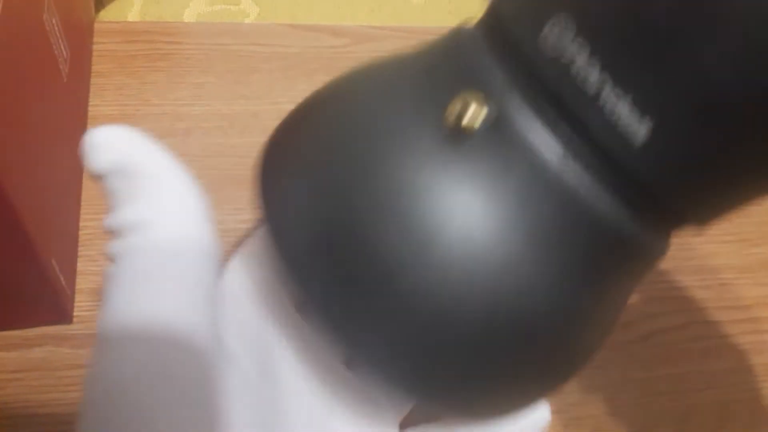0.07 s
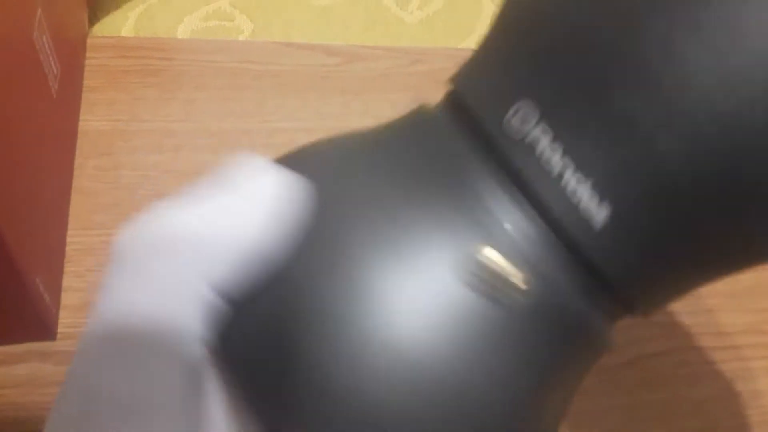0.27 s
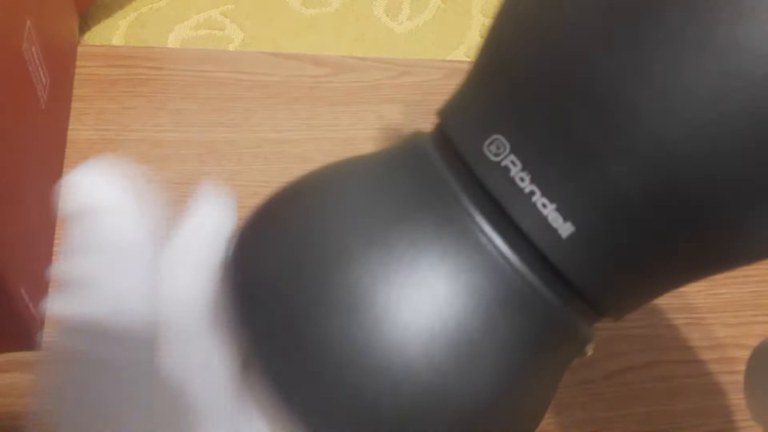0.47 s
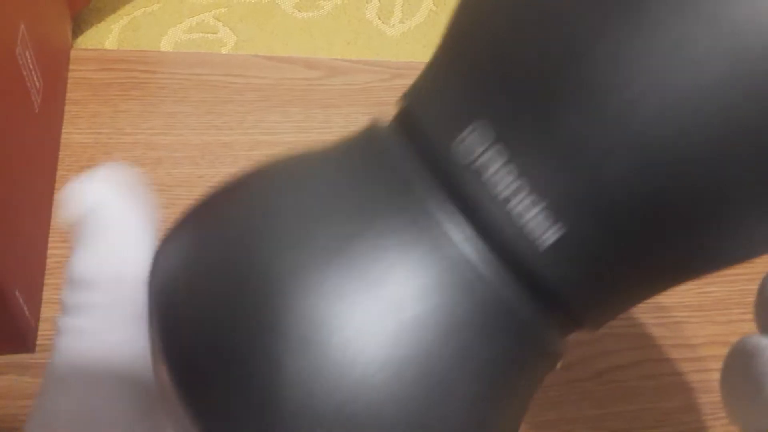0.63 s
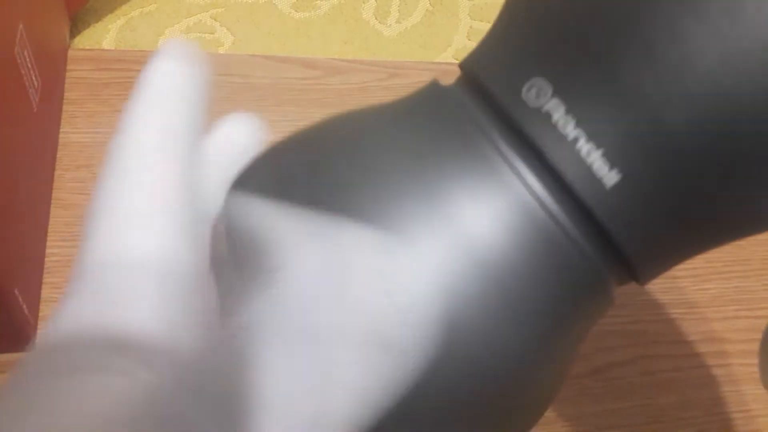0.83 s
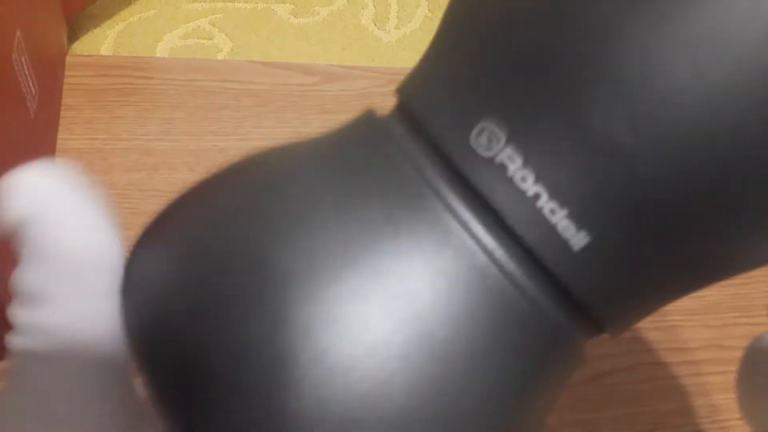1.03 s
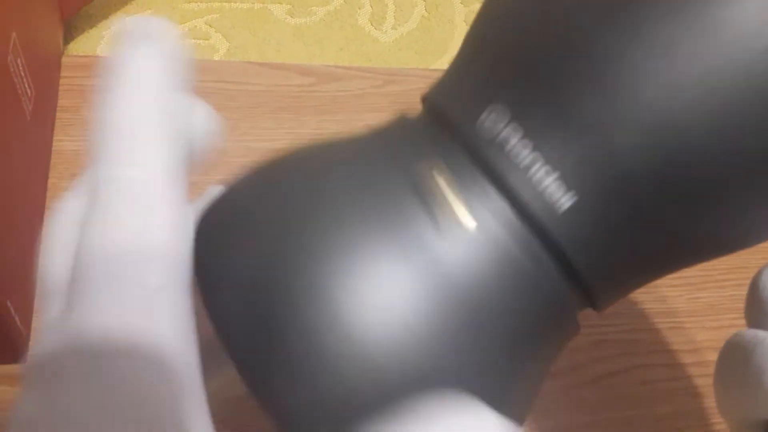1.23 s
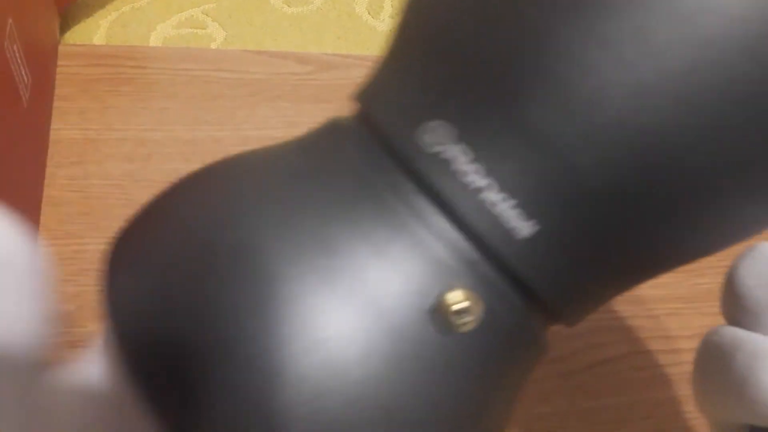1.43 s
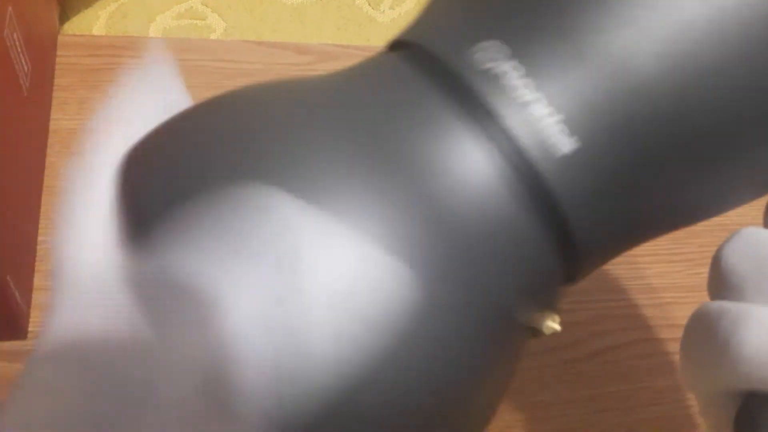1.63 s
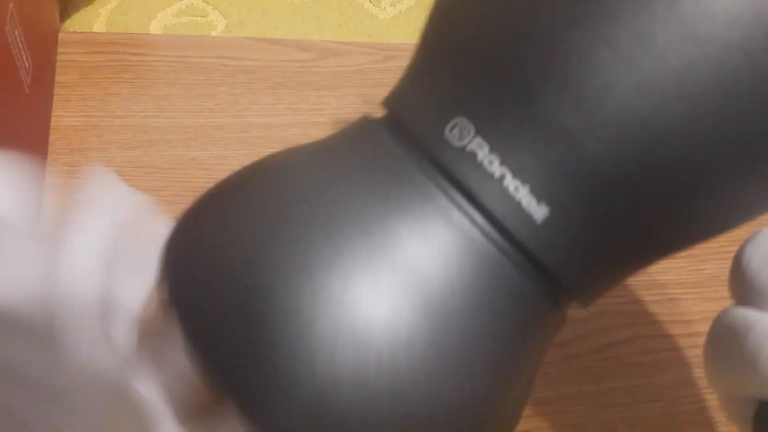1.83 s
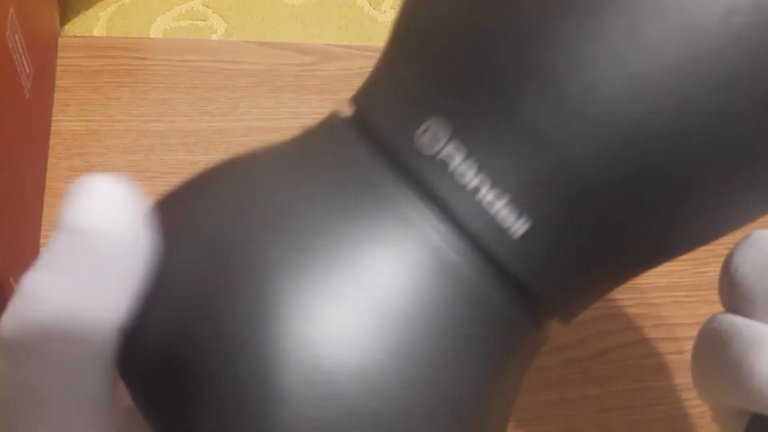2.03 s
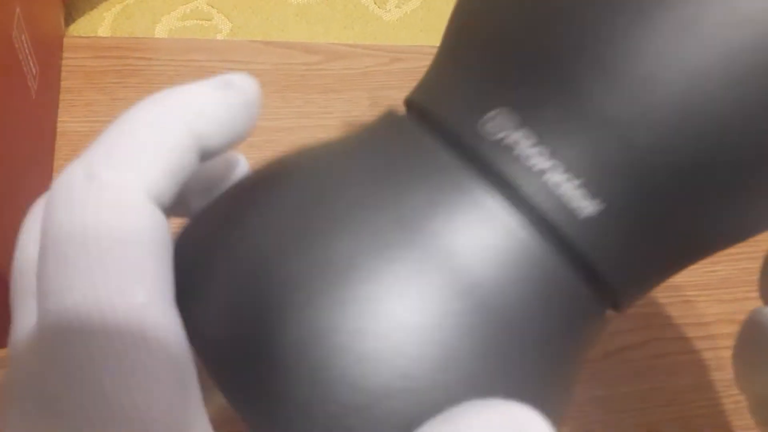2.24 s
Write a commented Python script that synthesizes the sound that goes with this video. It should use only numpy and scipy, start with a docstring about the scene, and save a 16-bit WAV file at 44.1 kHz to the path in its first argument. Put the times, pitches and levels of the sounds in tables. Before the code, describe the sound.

A metal coffee pot's loose base clanks as gloved hands spin it on its thread. Sharp, briefly ringing clanks land at about 0.2, 0.6, 1.1 and 1.6 seconds, with a softer one at 2.1. After each, the base scrapes round and wobbles with quick, duller clacks and small ticks. Faint glove brushing, soft bumps and low handling rumble lie underneath, in a small quiet room.

```python
"""Spinning a coffee pot base

Gloved hands spin the loose base of a metal coffee pot on its screw thread, in a small room.
Each push knocks the base against the thread and rings the shell; the base scrapes round,
ticks on the thread edges and clacks as it wobbles. Cotton gloves brush, rub and softly bump
the metal, and the pot rumbles as it shifts in the hands."""
import sys
import numpy as np
from scipy import signal
from scipy.fft import rfft, irfft
from scipy.io import wavfile
from scipy.ndimage import uniform_filter1d

SR = 44100
rng = np.random.default_rng(int(sys.argv[2]) if len(sys.argv) > 2 else 0)


def unload_wav(signal):
    """Save mono or channel-first audio to the path in sys.argv[1] as 16-bit WAV at rate SR, clipped to [-1, 1]."""
    wavfile.write(
        sys.argv[1],
        SR,
        np.round(np.clip(np.atleast_2d(signal).T, -1, 1) * 32767).astype(np.int16),
    )


N = 105840

# room tone spectrum (frequency [Hz], gain [dB])
ROOM_TONE_EQ = [(25, -25), (60, -11.5), (120, -8.5), (220, 2), (450, -3), (1100, -8), (2000, 0),
                (3100, -10.5), (4000, -20), (5000, -21.5), (9500, -27.5), (13000, -22)]
# room decay (frequency [Hz], t60 [s])
ROOM_DECAY = [(150, 0.21), (600, 0.26), (2000, 0.31), (5000, 0.44), (12000, 0.33)]
# handling rumble envelope (time [s], level [dB])
RUMBLE_ENVELOPE = [(0, -69), (.12, -64), (.42, -68), (.62, -65), (0.949, -62), (1.2, -55.5), (1.42, -74),
                   (1.75, -52), (1.9, -78), (2.15, -53.5), (2.4, -66.5)]
# rumble spectrum (frequency [Hz], gain [dB])
RUMBLE_EQ = [(30, -15), (65, -17), (110, -2.5), (170, -6.5), (300, -11), (700, -38.5), (3000, -68)]
# rub of the steadying hand (time [s], level [dB])
RUB_ENVELOPE = [(0, -48.5), (.07, -60), (.14, -82), (2.22, -81), (2.30, -59.5), (2.39, -56)]
# rub spectrum (frequency [Hz], gain [dB])
RUB_EQ = [(300, -25), (1200, -3), (2050, -4), (2600, -5), (3200, -6.5), (4500, -18), (6000, -25),
          (13000, -31.5)]
# glove strokes (centre [s], sigma [s], level [dB])
GLOVE_STROKES = [(0.122, 0.081, -70), (0.363, 0.0652, -56), (.8, 0.051, -61.5), (1.238, 0.033, -53),
                 (1.717, 0.056, -61), (2.213, 0.0352, -53)]
# cotton hiss spectrum (frequency [Hz], gain [dB])
COTTON_EQ = [(500, -2.5), (3000, 4), (5000, -5), (7500, 0), (9500, -10), (12500, 5.5), (14000, -29)]
# hand bumps (time [s], frequency [Hz], level [dB])
HAND_BUMPS = [(0.02, 200, -45), (.15, 160, -43), (.18, 200, -39), (.565, 160, -39.5), (1.073, 201, -28),
              (1.512, 240, -42.5), (1.963, 272, -57), (1.987, 220, -34.5), (2.079, 165, -34.5),
              (2.138, 206, -48), (2.213, 223, -33.5), (2.265, 200, -42)]
# thread edge ticks (time [s], level [dB])
THREAD_TICKS = [(.3465, -48.5), (0.422, -44), (0.822, -71), (1.268, -39.5), (1.758, -47)]
# tick spectrum (frequency [Hz], gain [dB])
TICK_EQ = [(1000, -37), (4500, 8), (5400, -4.5), (6200, -3), (7500, 8.5), (8600, -14.5), (13000, -11.5)]
# turns of the base (start [s], end [s], level [dB])
BASE_TURNS = [(0.271, 0.428, -35.5), (0.644, 0.856, -36.5), (1.068, 1.304, -37), (1.589, 1.69, -41),
              (1.659, 1.765, -33), (2.069, 2.139, -35)]
# thread scrape spectrum (frequency [Hz], gain [dB])
SCRAPE_EQ = [(60, -51.5), (180, -5.5), (400, -9), (850, -0.5), (1250, -6), (1700, 3.5), (2400, 1.5),
             (3400, -18.5), (4100, -6.5), (5200, -39.5), (9000, -33.5), (13000, -38.5)]
# metal contact spectrum (frequency [Hz], gain [dB])
CONTACT_EQ = [(40, -36.5), (180, -12.5), (400, -18.5), (900, -9.5), (1150, -8), (1400, -3.5), (1700, 5.5),
              (2450, 2.5), (2800, -8.5), (3500, -12.5), (4200, -10), (5200, -20.5), (7000, -33),
              (9500, -34.5), (13000, -29.5)]
# threaded rim (frequency [Hz], gain [dB], t60 [s])
RIM_MODES = [(1600, -25, 0.33), (1650, -9, 0.23), (2065, -10.5, 0.39), (2987, -2.5, 0.1),
             (4010, -5, 0.0667), (4113, -9.5, 0.083), (5416, -22, 0.24), (6700, -36.5, 0.5),
             (7040, -35, 0.292), (7400, -34.5, 0.22), (7560, -33, .2), (8340, -35.5, 0.27)]
# hand-damped body (frequency [Hz], gain [dB], t60 [s])
BODY_MODES = [(520, -29, 0.045), (1432, -7.5, 0.023), (1652, -1.5, 0.034), (1737, -1.5, 0.033),
              (2050, -4, 0.019), (2400, -4, 0.035), (2496, -3, 0.02)]
# thin shell (frequency [Hz], gain [dB], t60 [s])
SHELL_MODES = [(2885, -16, 0.45), (3000, -8, 0.18), (3099, -3, 0.097), (4040, -11.5, 0.12),
               (4130, -13.5, 0.25), (4212, -13.5, 0.178), (4220, -27, .17), (4610, -24, 0.21),
               (6384, -26, 0.32), (6370, -36, 0.29), (6580, -27, 0.32), (7210, -34, 0.26), (7780, -37, .2),
               (8380, -34.5, 0.455), (10314, -52, 0.32), (11390, -42, .25)]
# whole pot in the hands (frequency [Hz], gain [dB], t60 [s])
THUD_MODES = [(200, -44, 0.068), (313, -44.5, 0.061)]
# wobble impacts (time [s], gain [dB], pitch [Hz], chatter width [s], treble edge [Hz], rim gain [dB])
WOBBLES = [(0.0214, -18.5, 2050, 0.0029, 3007, -25.5), (0.15, -37, 833, 0.0027, 1850, -22.5),
           (.1828, -15, 1490, 0.003, 1760, -14), (0.226, -16, 1990, .002, 3500, -21),
           (0.2474, -20, 1862, 0.0015, 3480, 8), (0.341, -8, 1780, .002, 2710, 4),
           (0.3454, -2.5, 1922, 0.0024, 3600, -11), (0.3875, -11, 1960, 0.0019, 2700, -12),
           (.4160, -4.5, 1820, 0.0037, 2590, -9), (0.4212, -7, 1782, .0015, 2600, -19),
           (0.6347, -24.5, 1860, 0.0021, 2400, -17), (.6560, -40, 3000, .002, 4320, -15),
           (0.6773, -8, 1720, 0.0013, 2730, 0), (0.6994, -14, 1800, 0.003, 3250, -42),
           (0.7312, -16.5, 1640, 0.00133, 2600, -24), (0.821, -7, 1734, 0.0022, 2590, -20),
           (1.0551, -13, 1760, 0.0025, 3200, 6), (1.0589, -11.5, 1574, 0.0022, 3240, -15),
           (1.1036, -7, 1610, .002, 2970, -1), (1.1105, -9.5, 1496, 0.0037, 2400, -9),
           (1.122, -12.5, 1744, 0.00107, 2800, -11.5), (1.1398, -10.5, 1660, 0.003, 2570, -1),
           (1.172, -12.5, 1390, 0.0011, 2560, -8), (1.2122, -26, 2050, 0.00087, 3000, 3.5),
           (1.266, -2.5, 1557, 0.0045, 2990, -1.5), (1.5093, -40.5, 1650, 0.003, 3200, -3),
           (1.5270, -43, 1462, .002, 2800, -6), (1.5509, -32.5, 1850, 0.006, 3040, -2),
           (1.701, -11, 2010, .002, 2860, -18), (1.7286, -15.5, 1780, 0.0036, 2800, 2.5),
           (1.742, -11, 1710, 0.0019, 2600, -3), (1.7569, -5.5, 1692, 0.0025, 2960, -3),
           (1.7622, -15, 1760, 0.0029, 2890, -5.5), (1.9650, -35, 1680, .003, 2810, -26),
           (1.9837, -18, 2305, 0.0019, 2580, -26), (2.1270, -24.5, 1600, 0.007, 2500, -12),
           (2.1363, -16, 1660, 0.0017, 2500, -3), (2.2280, -37, 3220, 0.00147, 5800, -13),
           (2.286, -41, 3200, .001, 5000, -8)]
# push impacts (time [s], gain [dB], shell gain near 3 kHz [dB], 4 kHz [dB], 6 kHz [dB],
# pitch [ratio], chatter width [s], crack treble [dB], thud gain [dB])
PUSHES = [(.2040, -1, -14, -8, -6.5, .99, 0.0025, 0.5, -2),
          (0.6416, 1, -1.5, -4.5, 0.5, 0.99, 0.0037, -1, -4),
          (1.064, 0, -2, -4, -3, 1.012, 0.0021, -1, -2.5),
          (1.5799, -1.5, -3.5, 0, -1, 1.0, 0.0041, 0.5, -0.5),
          (2.0886, -5.5, -24, -10.5, -11.5, 1.0, 0.0035, -8.5, -5)]


def undb(db):
    """Decibels to gain."""
    return 10 ** (np.asarray(db) / 20)


def unit(x):
    """Scale to rms 1."""
    return x / np.sqrt(np.mean(x ** 2))


def add(out, start_s, x):
    """Mix x in at start_s."""
    i = max(int(start_s * SR), 0)
    out[i:i + len(x)] += x[:N - i]


def conv(x, response):
    """Convolve, keeping the input length."""
    return signal.fftconvolve(x, response)[:len(x)]


def on_log(points, hz):
    """Interpolate (Hz, value) points over log frequency."""
    knots_hz, values = np.array(points, float).T
    return np.interp(np.log(np.maximum(hz, 1)), np.log(knots_hz), values)


def colour(x, eq, size=4096):
    """Minimum-phase filter from (Hz, dB) points."""
    hz = np.arange(size // 2 + 1) * SR / size
    cepstrum = irfft(np.log(undb(on_log(eq, hz))))
    cepstrum[1:size // 2] *= 2
    cepstrum[size // 2 + 1:] = 0
    return conv(x, irfft(np.exp(rfft(cepstrum))))


def noise(eq, n=N):
    """Coloured noise, rms 1."""
    return unit(colour(rng.standard_normal(n), eq))


def grains(eq, per_s, spread_db):
    """Random tiny catches of uneven size, coloured, rms 1."""
    catches = (rng.random(N) < per_s / SR) * rng.choice([-1, 1], N)
    return unit(colour(catches * undb(spread_db * rng.standard_normal(N)), eq))


def envelope(points):
    """Gain curve from (s, dB) points."""
    times_s, db = np.array(points).T
    return undb(np.interp(np.arange(N) / SR, times_s, db))


def rise(t, tau_s):
    """Exponential attack."""
    return 1 - np.exp(-t / tau_s)


def fade(t, t60_s):
    """Exponential decay."""
    return np.exp(-np.log(1000) * t / t60_s)


def ring(t, modes):
    """Decaying partials of alternating sign."""
    return sum((-1) ** k * undb(db) * np.sin(2 * np.pi * hz * t) * fade(t, t60_s)
               for k, (hz, db, t60_s) in enumerate(modes))


def flickering_ring(t, modes, flicker_per_s=73.4):
    """Partials of the moving pot, wavering in strength and phase."""
    out, knots_s = 0, np.arange(256) / flicker_per_s
    for hz, db, t60_s in modes:
        a, b = (np.interp(t, knots_s, row) * rise(t, 0.004) for row in rng.standard_normal((2, 256)))
        phase = 2 * np.pi * (hz * t + rng.random())
        out = out + undb(db) * fade(t, t60_s) * ((1 + a) * np.sin(phase) + b * np.cos(phase))
    return out / np.sqrt(2)


def room_tone(level_db=-59):
    """Steady background noise."""
    return undb(level_db) * noise(ROOM_TONE_EQ)


def reflections(x, gain_db=-9, delay_s=0.0067, build_s=0.0065):
    """Diffuse room tail, one decay time per band."""
    t = np.arange(SR * 3 // 4 + 1) / SR
    white, hz = rfft(rng.standard_normal(len(t))), np.fft.rfftfreq(len(t), 1 / SR)
    tail = 0
    for centre_hz, t60_s in ROOM_DECAY:
        band = on_log([(f, float(f == centre_hz)) for f, _ in ROOM_DECAY], hz)
        tail = tail + irfft(white * band, len(t)) * fade(t, t60_s)
    spectrum = rfft(tail * np.clip((t - delay_s) / build_s, 0, 1))
    power = np.abs(spectrum) ** 2
    ripple = uniform_filter1d(power, size=31) / uniform_filter1d(power, size=801)
    tail = irfft(spectrum / np.sqrt(ripple), len(t))[:SR * 2 // 3]  # even out the colour
    return undb(gain_db) * conv(x, tail / np.linalg.norm(tail))


def rumble():
    """The pot shifts in the hands."""
    return envelope(RUMBLE_ENVELOPE) * noise(RUMBLE_EQ)


def rubbing():
    """A hand slides faintly on the pot before and after the spinning."""
    return envelope(RUB_ENVELOPE) * noise(RUB_EQ)


def gloves(bump_t60_s=0.042):
    """Cotton hisses over the metal; the hands bump it softly."""
    t = np.arange(N) / SR
    strokes = sum(undb(db) * np.exp(-.5 * ((t - centre_s) / sigma_s) ** 2)
                  for centre_s, sigma_s, db in GLOVE_STROKES)
    out = strokes * grains(COTTON_EQ, per_s=2200, spread_db=4)
    for start_s, hz, db in HAND_BUMPS:
        add(out, start_s, ring(t, [(hz, db, bump_t60_s)]) * rise(t, 0.00067))
    return out


def ticks():
    """Thread edges graze with a short bright rasp."""
    out, t = np.zeros(N), np.arange(SR // 4) / SR
    for start_s, db in THREAD_TICKS:
        add(out, start_s, undb(db) * noise(TICK_EQ, len(t)) * fade(t, t60_s=0.11))
    return out


def scraping(attack_s=0.024, release_s=0.023):
    """The thread sticks and slips while the base turns."""
    force, t = np.zeros(N), np.arange(N) / SR
    for start_s, end_s, db in BASE_TURNS:
        attack = np.clip((t - start_s) / attack_s, 0, 1)
        release = np.exp(-np.maximum(t - end_s, 0) / release_s)
        force += undb(db) * attack * release
    return force * grains(SCRAPE_EQ, per_s=980, spread_db=2.5)


def contact(t, chatter_s, chatter_db=6):
    """An impulse plus a few milliseconds of metal chatter."""
    chatter = rng.standard_normal(len(t)) * np.exp(-(t / (2 * chatter_s)) ** 2)
    force = undb(chatter_db) * chatter / np.linalg.norm(chatter)
    force[0] += .8
    return colour(colour(force, CONTACT_EQ), [(40, -9.5), (160, 0)])


def clacks(gain_db=14.5, body_db=-20, body_t60_s=.025, rim_db=-35):
    """The wobbling base strikes dully: one short body mode, faint rim ring."""
    out, t = np.zeros(N), np.arange(SR // 2) / SR
    for start_s, db, hz, chatter_s, edge_hz, rim_gain_db in WOBBLES:
        body = ring(t, [(hz, body_db, body_t60_s)]) * rise(t, 0.0017)
        dull_eq = [(600, 2.5), (1200, 0), (edge_hz * 0.53, 0),
                   (edge_hz, -4), (edge_hz * 1.32, -13), (edge_hz * 2, -19.5)]
        blow = colour(contact(t, chatter_s) + body, dull_eq)
        rim = undb(rim_db + rim_gain_db) * flickering_ring(t, RIM_MODES) * rise(t, 0.00185)
        add(out, start_s, undb(gain_db + db) * (blow + rim))
    return out


def clanks(gain_db=11.5, body_db=-21, shell_db=-29, flare_db=-11, flare_t60_s=.034):
    """A push knocks base against thread: crack, thud, brief flare, then a quiet shell ring."""
    out, t = np.zeros(N), np.arange(SR // 2) / SR
    for start_s, db, low_db, mid_db, high_db, pitch, chatter_s, treble_db, thud_db in PUSHES:
        strike_eq = [(3100, low_db), (3950, mid_db), (4600, mid_db), (6300, high_db)]
        shell_modes = [(hz * pitch * rng.normal(1, 0.0023), mode_db + on_log(strike_eq, hz), t60_s)
                       for hz, mode_db, t60_s in SHELL_MODES]
        body_modes = [(hz * pitch * rng.normal(1, 0.011), mode_db, t60_s)
                      for hz, mode_db, t60_s in BODY_MODES]
        flare = undb(flare_db) * ring(t, [(hz, mode_db, flare_t60_s) for hz, mode_db, _ in shell_modes])
        sustain = undb(shell_db) * flickering_ring(t, shell_modes)
        shell = (flare + sustain) * rise(t, 0.0021)
        body = undb(body_db) * ring(t, body_modes)
        thud = undb(thud_db) * ring(t, THUD_MODES)
        crack = colour(contact(t, chatter_s), [(3000, 0.018), (5500, treble_db)])
        add(out, start_s, undb(gain_db + db) * (crack + body + shell + thud))
    return out


def scene():
    """Pot and gloves, their reflections, rumble and room tone; mono."""
    direct = clanks() + clacks() + scraping() + gloves() + rubbing() + ticks()
    return (direct + reflections(direct) + rumble() + room_tone())[None]


def record(dry, highpass_hz=59.4, lowpass_hz=13300):
    """High-pass, soft clip, low-pass."""
    thinned = signal.sosfilt(signal.butter(2, highpass_hz, "high", fs=SR, output="sos"), dry)
    clipped = thinned / (1 + thinned ** 8) ** (1 / 8)
    return signal.sosfilt(signal.ellip(8, .2, 70, lowpass_hz, fs=SR, output="sos"), clipped)


dry = scene()
out = record(dry)
unload_wav(out)
```